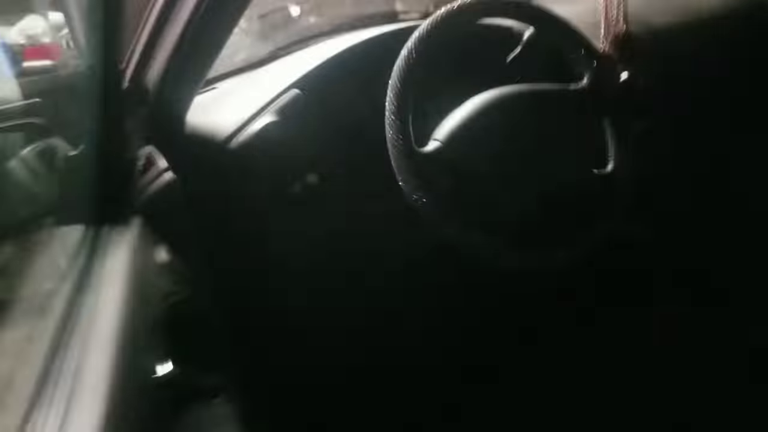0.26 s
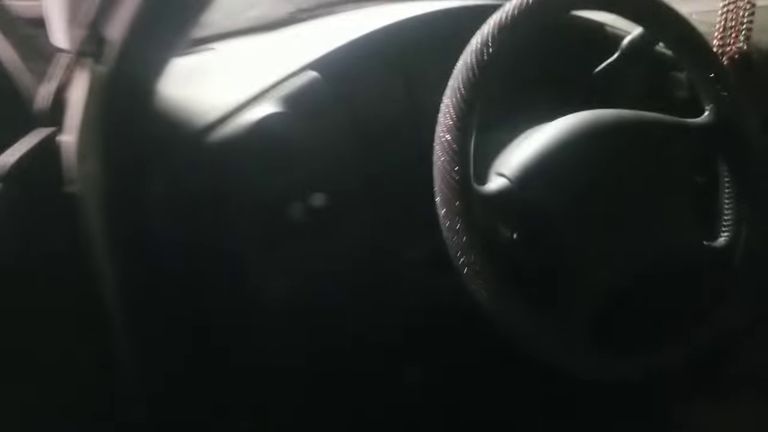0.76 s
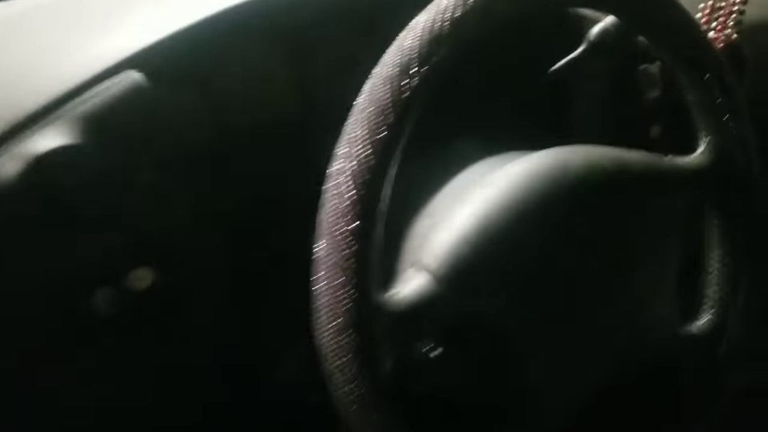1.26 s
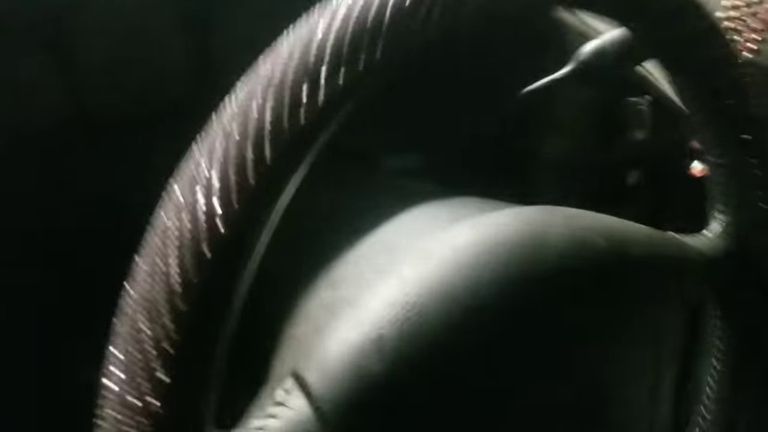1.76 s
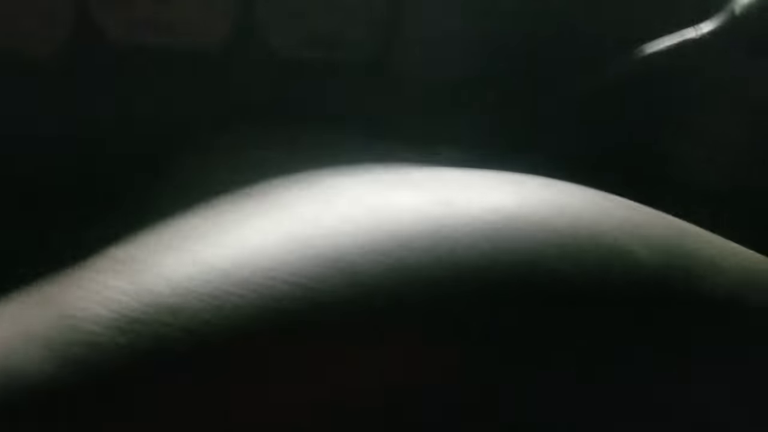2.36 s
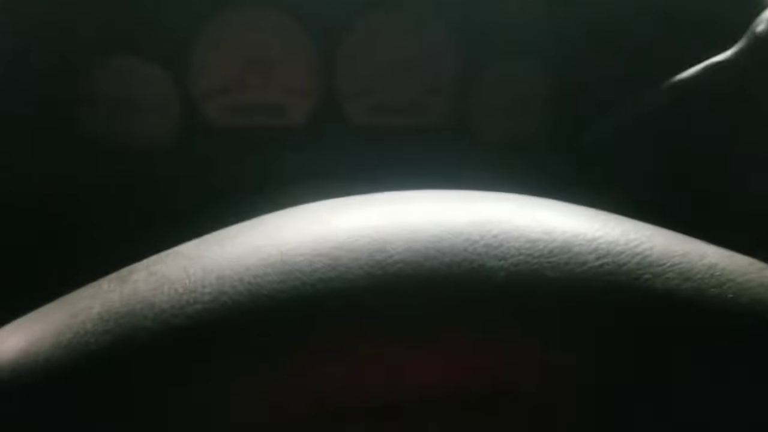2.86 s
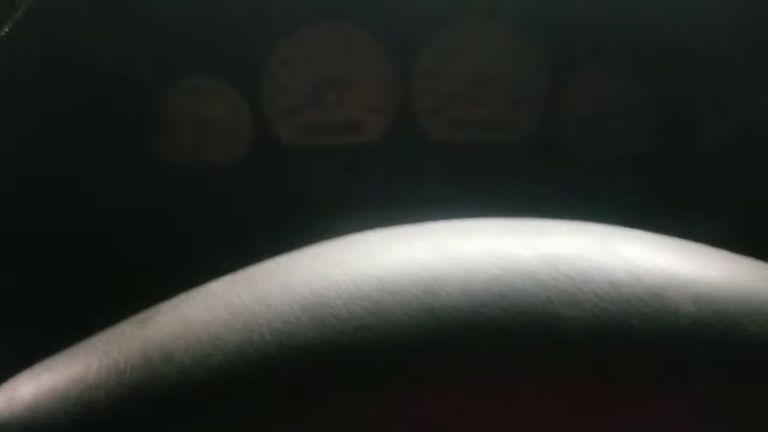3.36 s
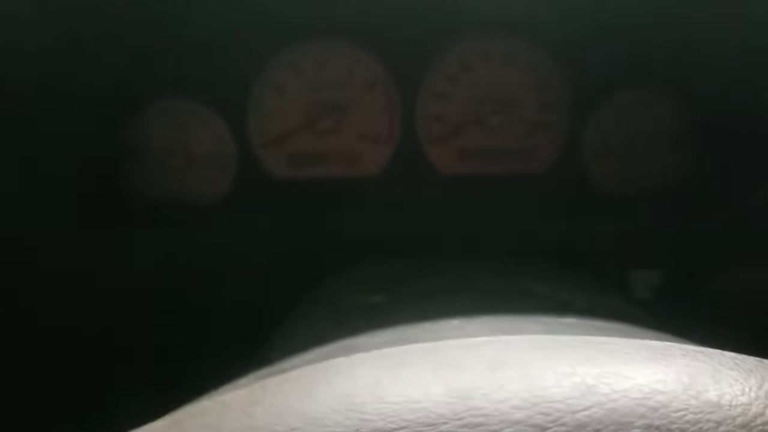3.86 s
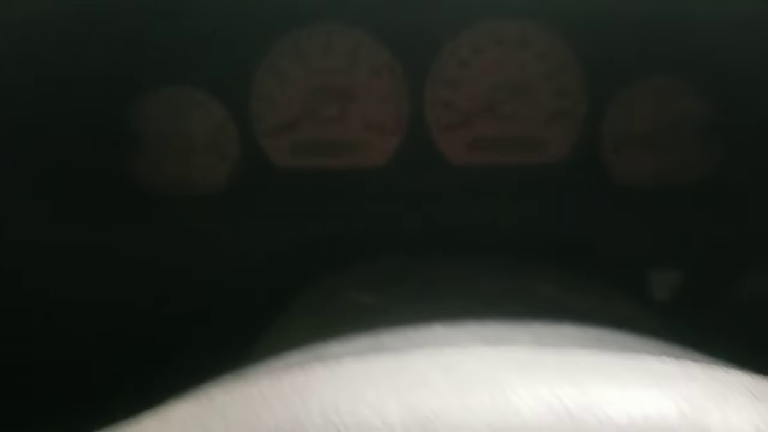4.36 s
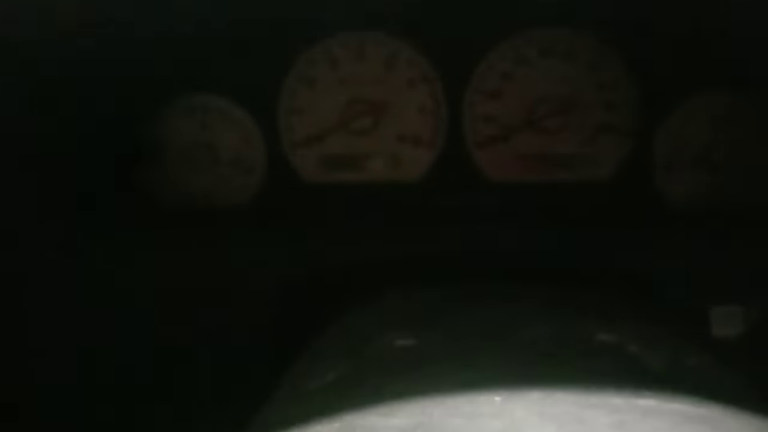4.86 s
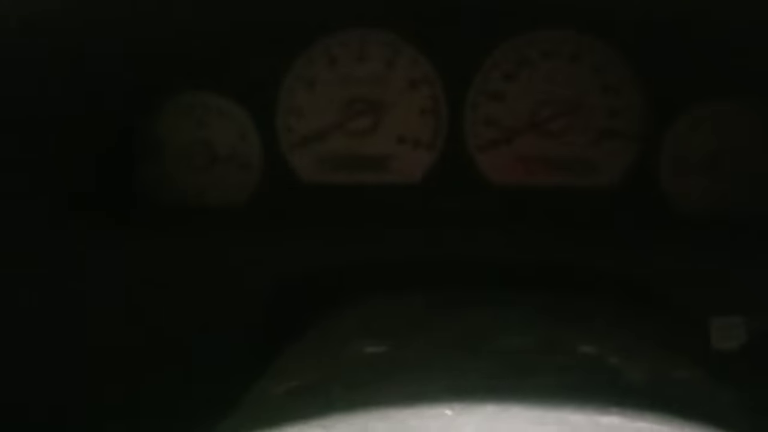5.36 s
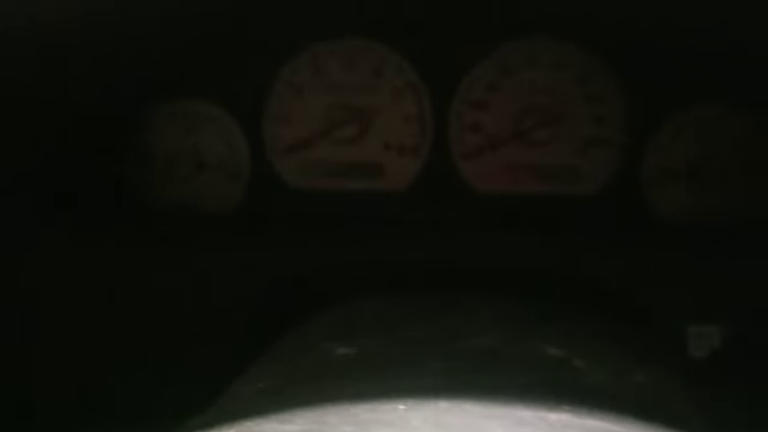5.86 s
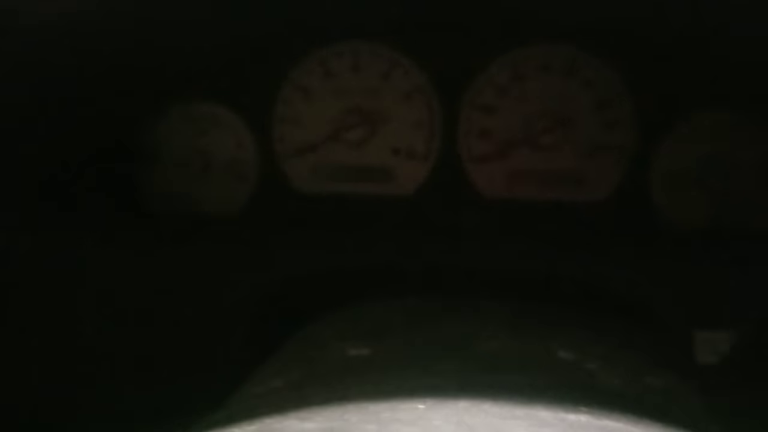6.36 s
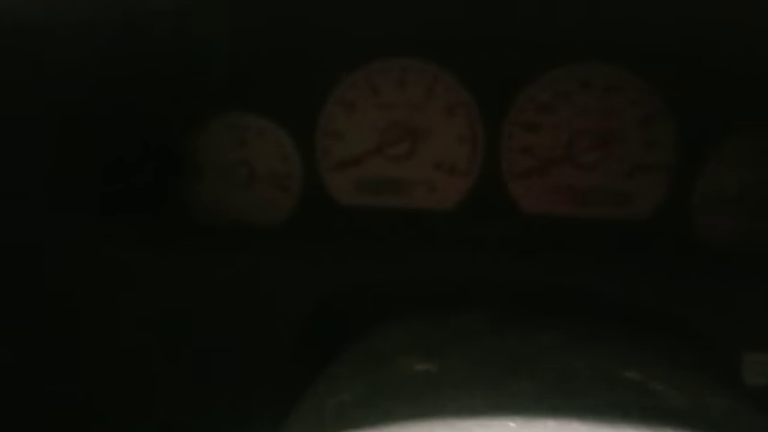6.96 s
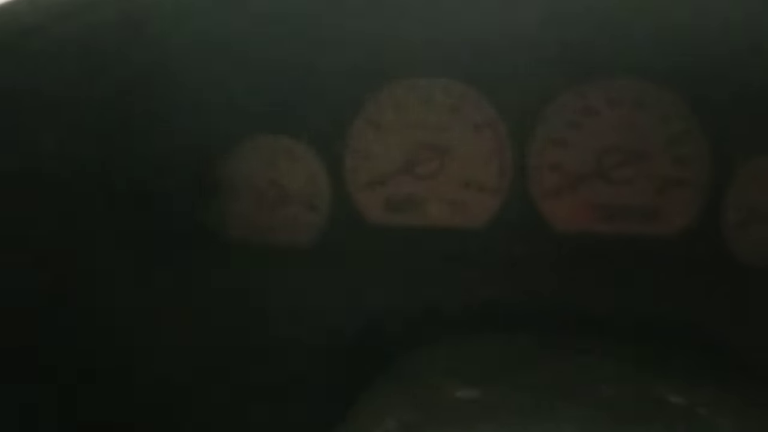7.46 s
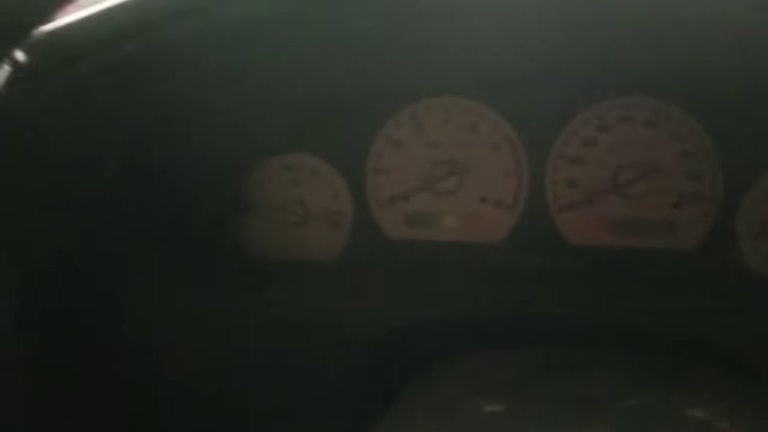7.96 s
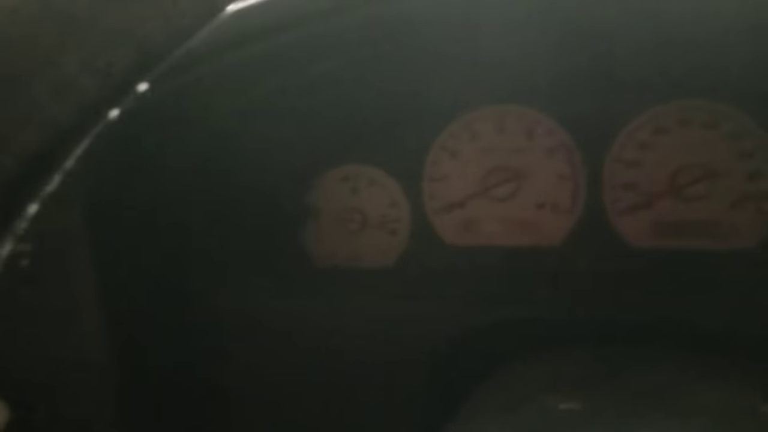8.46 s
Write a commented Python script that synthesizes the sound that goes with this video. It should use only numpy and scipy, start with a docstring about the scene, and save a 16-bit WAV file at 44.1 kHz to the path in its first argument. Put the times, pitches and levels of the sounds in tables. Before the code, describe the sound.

Inside a parked car, cloth rustles and a hard knock lands, then keys jangle loudly over dull bumps, and an ignition lock snaps twice without starting.

```python
"""Workshop hum and hiss, filtered noise and one tone, are low at first and rise around 1.7 s.
From the start sleeves rustle (noise with grains), resonant noise bursts scrape or swell, and light clicks fall.
A hard door knock, then trim taps, are dispersed pulses with dying noise. From 2.1 s a hand grabs the keys,
whose runs of collisions excite metal modes, over column bumps. A dry tick falls at 3.2 s; thin gliding tones
waver near 3.2-3.9 s and 7-8.5 s. Near 4.4 s and 7.3 s the ignition lock snaps, ringing its modes, and its
shroud thuds; no engine is heard."""
import sys
import numpy as np
from scipy import signal
from scipy.fft import rfft, irfft, next_fast_len
from scipy.io import wavfile
from scipy.ndimage import uniform_filter1d

SR = 44100
rng = np.random.default_rng(int(sys.argv[2]) if len(sys.argv) > 2 else 0)


def to_wav(sig):
    """Store sig (one row per channel, or 1-D mono) as 16-bit WAV at the path in sys.argv[1].

    Samples outside -1..1 are clipped; the rate is SR.
    """
    pcm = np.clip(np.atleast_2d(sig), -1, 1) * 32767
    pcm = np.round(pcm).astype(np.int16)
    wavfile.write(sys.argv[1], SR, pcm.T)  # frames by channels


N = 383563
RING = np.arange(14400) / SR  # time axis of one dying sound (s)
SIDE_LAG = 22  # lag at the right microphone of sound from the left (samples)

# Radiation of the plastic trim, shared by taps and shroud thuds: frequency_hz, relative_density_db
TRIM_SPECTRUM = [(35, -36), (60, -2.5), (672, 6), (1140, -4.5), (1690, -8), (2490, -19), (2870, -36),
                 (3390, -17), (3670, -50), (4420, -26), (8000, -63), (10400, -54), (17600, -120)]
# Damping of the plastic trim: frequency_hz, t60_s (before a blow's length factor)
TRIM_DAMPING = [(200, 0.2), (700, 0.1), (3000, 0.046)]


def gain_of(db):
    """Level is logarithmic: 20 dB is a factor of ten in amplitude."""
    return 10 ** (np.asarray(db) / 20)


def evened(x):
    """Power normalisation: scales to rms 1."""
    return x / np.sqrt(np.mean(x ** 2) + 1e-20)


def peaked(x):
    """Short-time power normalisation: the loudest few milliseconds get rms 1."""
    power = (x ** 2).mean(0)
    return x / np.sqrt(uniform_filter1d(power, size=160).max())


def read(points, hz):
    """Interpolation on a logarithmic frequency axis."""
    f, value = np.transpose(points)
    return np.interp(np.log(hz + 1), np.log(f + 1), value)


def add(mix, s, sound):
    """Linear superposition of a stereo sound on the mix from time s."""
    part = mix[:, round(s * SR):][:, :sound.shape[1]]
    part += sound[:, :part.shape[1]]


def colour(x, spectrum, tilt_db=0):
    """Minimum-phase filtering: causality forbids any sound ahead of the excitation."""
    hz = abs(np.fft.fftfreq(4096, 1 / SR))
    tilt = tilt_db * np.log2(np.maximum(hz, 200) / 1000)  # dB per octave about 1 kHz
    log_gain = np.log(gain_of(np.maximum(read(spectrum, hz) + tilt, -100)))
    # the Hilbert transform of the log gain supplies the phase
    response = np.fft.ifft(np.exp(np.conj(signal.hilbert(log_gain)))).real[:2048]
    taps = response * signal.windows.tukey(4096, .5)[2048:]
    return signal.oaconvolve(x, taps[None], axes=1)[:, :x.shape[1]]


def wander(hz, count=24):
    """Superposed sines of random phase make a random drift of rms 1, moving up to hz times a second."""
    t = np.linspace(0, N / SR, N // 128)
    rates = np.geomspace(hz / 10, hz, count)[:, None]
    drift = np.sin(2 * np.pi * (rates * t + rng.random((count, 1)))).sum(0)
    return np.interp(np.arange(N) / SR, t, evened(drift))


def diffuse(size, alike=1):
    """Diffuse-field coherence: two spaced microphones agree in the bass and part in the treble."""
    # left-right coherence: frequency_hz, coherence_ratio (before the factor alike)
    likeness = [(50, 0.94), (130, 0.48), (300, 0.59), (700, 0.021), (15000, 0.0054)]
    padded = next_fast_len(size)
    left, other = rfft(rng.standard_normal((2, padded)))
    same = np.clip(alike * read(likeness, np.fft.rfftfreq(padded, 1 / SR)), -1, 1)
    right = same * left + np.sqrt(1 - same ** 2) * other
    return irfft(np.array([left, right]), padded)[:, :size]


def scatter(decay, alike=1):
    """Frequency-dependent damping: dense reflections of energy 1, each band dying at its own speed."""
    hz = np.fft.rfftfreq(len(RING), 1 / SR)
    noise, out = rfft(diffuse(len(RING), alike)), 0
    centres, t60s = np.transpose(decay)
    for share, t60 in zip(np.eye(len(decay)), t60s):
        band = irfft(noise * read(np.c_[centres, share], hz), len(RING))
        fade = gain_of(-60 * RING / t60)
        out = out + band * fade / np.linalg.norm(fade)
    return out


def ring(modes, spread_db):
    """Modal superposition of energy 1: each blow excites and each microphone hears other mode strengths."""
    hz, db, t60 = np.transpose(modes)[:, :, None]
    waves = gain_of(db - 60 * RING / t60) / np.sqrt(t60) * np.exp(2j * np.pi * hz * RING)
    strength = gain_of(spread_db * rng.standard_normal((2, len(modes))))
    phase = np.exp(2j * np.pi * rng.random((2, len(modes))))
    return evened(((strength * phase) @ waves).imag) / np.sqrt(len(RING))


def bending(delays_ms, twist_rad):
    """Bending-wave dispersion: bass crosses a panel slower (delays hold at 1 kHz); the right lags by a twist."""
    khz = np.fft.rfftfreq(len(RING), 1 / SR) / 1000
    travel = 4 * np.pi * np.outer(delays_ms, np.sqrt(khz))
    phase = travel + np.array([[0], [1]]) * twist_rad
    return irfft(np.exp(-1j * phase), len(RING)) * np.linspace(1, 0, len(RING))


def blows(rows, spectrum, decay, offset_db, direct_db, delays_ms, pan_db, graze_db, length=1,
          twist_rad=0, alike=1, modes=None, ring_db=0, detune=0.023):
    """Impact response: surfaces graze, a direct pulse lands, panels shudder and any modes ring.

    offset_db adds to every row's level, length scales the t60s of the shudder's damping (the modes keep
    theirs), pan_db is left minus right."""
    out, pulse = np.zeros((2, N)), gain_of(direct_db) * bending(delays_ms, twist_rad)
    lead = 300  # samples of grazing ahead of the blow
    for s, level_db, tilt_db in rows:
        shudder = scatter([(hz, t60 * length) for hz, t60 in decay], alike)
        graze = diffuse(lead) * np.linspace(0, 1, lead) ** 2
        graze *= gain_of(graze_db) / np.linalg.norm(graze[0])
        sound = colour(np.hstack([graze, pulse + shudder]), spectrum, tilt_db)
        if modes:
            grip = 1 + detune * rng.standard_normal()  # the grip shifts all modes together
            held = [(hz * grip, mode_db + tilt_db * np.log2(hz / 1000), t60) for hz, mode_db, t60 in modes]
            ring_gain = gain_of(ring_db) * np.linalg.norm(sound[0])
            sound[:, lead:] += ring_gain * ring(held, spread_db=-9.0)
        add(out, s - lead / SR, gain_of(level_db + offset_db) * peaked(sound))
    return out * gain_of([[pan_db / 2], [-pan_db / 2]])


def hiss():
    """Interchannel delay: hiss from all around, and a part from the open door that is earlier on the left."""
    # hiss spectrum: frequency_hz, relative_density_db
    hiss_spectrum = [(590, -48.5), (1000, -11), (1160, -7), (1680, -1), (2200, -13.5), (2520, -9),
                     (2640, -5.5), (3020, -1), (3400, -3), (5070, -5), (5490, -3), (8050, -23), (9640, -13),
                     (10700, -20.5), (14000, -19.5), (14800, -29)]
    door_share = .35  # share of power
    left, right, door = rng.standard_normal((3, N))
    around = np.array([left, right])
    from_door = np.array([door, np.roll(door, SIDE_LAG)])
    both = np.sqrt(1 - door_share) * around + np.sqrt(door_share) * from_door
    return evened(colour(both, hiss_spectrum))


def shop(hum_db, hiss_db, mains_db, waver_db, hiss_waver_db, drone_db):
    """Modulated noise: rumble, low drone and hiss waver apart, low at first and rising around 1.7 s."""
    # hum spectrum: frequency_hz, relative_density_db
    hum_spectrum = [(12, -44.5), (20, -12.5), (43, -6.5), (64, -9.5), (99, -1), (129, -13), (237, -22.5),
                    (274, -15), (357, -8.5), (387, -11), (463, -11), (1000, -31), (1300, -57), (2200, -120)]
    # balance of the microphones: frequency_hz, left_minus_right_db
    lean = [(60, 1.5), (110, -0.5), (200, 0.5), (380, -6), (700, 0), (1290, 2.5), (2380, -2), (4400, 5.5),
            (8120, 6), (15000, -2.5)]
    rise_s, rise_takes_s, early_db = 1.7, 0.38, -11.5  # middle and slowness of the rise; level before it
    mains_hz = 104  # electrical hum
    t = np.arange(N) / SR
    rise_db = early_db * (1 - np.tanh((t - rise_s) / rise_takes_s)) / 2
    hum = evened(colour(diffuse(N), hum_spectrum))
    rumble = signal.sosfiltfilt(signal.butter(2, 200, fs=SR, output="sos"), hum)
    drone = hum - rumble
    wavering_rumble = rumble * gain_of(waver_db * wander(hz=11.0))
    wavering_drone = drone * gain_of(drone_db * wander(hz=7.5))
    air = gain_of(hum_db) * (wavering_rumble + wavering_drone)
    air += gain_of(mains_db) * np.sqrt(2) * np.sin(2 * np.pi * mains_hz * t + wander(hz=6))
    air += gain_of(hiss_db + hiss_waver_db * wander(hz=5)) * hiss()
    sides = []
    for side, sign in enumerate((1, -1)):
        balance = [(hz, sign * db / 2) for hz, db in lean]
        sides.append(colour(air[[side]], balance)[0])
    return np.array(sides) * gain_of(rise_db)


def cabin(x):
    """Reverberation by convolution: the faint tail of the cabin and the shop beyond its open door."""
    # reverberation: frequency_hz, t60_s
    cabin_decay = [(100, 0.71), (500, 0.061), (2000, 0.15), (5000, 0.32), (12000, 0.16)]
    return signal.oaconvolve(x, scatter(cabin_decay), axes=1)[:, :N]


def clunks():
    """Distant impacts: a weak direct pulse under the shudder of things further off in the shop."""
    # clunks: start_s, level_db (before offset), brightness_db_per_octave
    clunk_rows = [(0.586, -40, 0), (0.595, -39.5, -5)]
    # their spectrum: frequency_hz, relative_density_db
    far_spectrum = [(35, -58), (60, -19), (370, -14.5), (468, 1.5), (646, -15), (1280, -14), (1620, -28),
                    (1730, -25), (5380, -18.5), (10000, -59), (13000, -87), (22000, -120)]
    # their damping: frequency_hz, t60_s (before the length factor)
    far_damping = [(400, 0.71), (1500, 0.31), (6000, 0.14)]
    return blows(clunk_rows, far_spectrum, far_damping, offset_db=0.5, direct_db=-18,
                 delays_ms=(.5, .7), pan_db=-0.5, graze_db=-20.0, length=0.38)


def rustle(rub_offset_db, fizz_offset_db, grains_per_s, grain_db, flutter_db):
    """Stick-slip friction: cloth slips in small grains, a dull rub and a fizz that follow each stroke."""
    # strokes of sleeve and hand over seat and wheel:
    # fastest_s, rise_s, fall_s, rub_db, fizz_db (levels before the offsets)
    strokes = [(0.02, 1, 0.29, -38, -57), (0.599, 0.42, 0.45, -60.5, -75), (1.39, 0.35, 0.27, -89, -71),
               (1.66, 0.23, 1, -54, -62), (1.86, 1, 0.9, -58, -73.5), (2.16, 0.34, 0.43, -49.5, -60),
               (2.548, 0.14, 0.94, -62.5, -68), (4.47, 0.037, 0.12, -52, -57.5),
               (4.599, 0.22, 0.19, -66.5, -62), (4.8, 0.083, 0.18, -69.5, -69),
               (4.898, 0.076, 0.051, -56.5, -72), (7.28, 0.39, 0.32, -61, -64),
               (7.41, 0.088, 0.54, -55, -64), (7.63, 0.18, 0.51, -68, -68), (7.83, 0.19, 0.21, -56, -61.5),
               (8.051, 0.083, 0.56, -57.5, -70.5), (8.27, 0.33, 0.39, -69, -61)]
    # spectra of rub and fizz: frequency_hz, relative_density_db
    rub_spectrum = [(18, -33.5), (30, -6), (123, -1), (223, -12.5), (345, -0.5), (582, -7.5), (839, -11.5),
                    (1260, -13.5), (1630, -16), (3450, -20.5), (4970, -18.5), (7000, -36), (9100, -63),
                    (15400, -120)]
    fizz_spectrum = [(1200, -33), (2500, 4.5), (4000, 8), (5600, 7.5), (8200, -3.5), (10000, 3), (12500, 1),
                     (14500, -9)]
    depth_db = 20.5  # gained over a stroke's rise and lost over its fall
    hits = rng.uniform(-2.0, 1, N) * (rng.random(N) < grains_per_s / SR)
    grain_response = scatter([(500, 0.048), (6000, 0.013)])
    grains = evened(signal.oaconvolve(hits[None], grain_response, axes=1)[:, :N])
    flutter = gain_of(flutter_db * wander(hz=64.7))
    slip = (diffuse(N) + gain_of(grain_db) * grains) * flutter
    t = np.linspace(0, N / SR, N // 128)
    s, rise, fall, rub_db, fizz_db = np.transpose(strokes)[:, :, None]
    speed_db = -depth_db * np.maximum((s - t) / rise, (t - s) / fall)

    def envelope(db):
        """Power summation of the overlapping strokes."""
        return np.interp(np.arange(N) / SR, t, np.linalg.norm(gain_of(db + speed_db), axis=0))

    rub = envelope(rub_db + rub_offset_db) * evened(colour(slip, rub_spectrum))
    fizz = envelope(fizz_db + fizz_offset_db) * evened(colour(slip, fizz_spectrum))
    return rub + fizz


def thin_tones(waver, flutter_db):
    """Frequency and amplitude modulation: faint thin tones waver, swell, glide and fade, earlier on the left."""
    # thin tones: start_s, length_s, level_db (before the swell), first_pitch_hz, last_pitch_hz
    tone_rows = [(3.24, 0.4, -59.5, 2810, 2840), (3.3, 0.59, -58, 3380, 3430),
                 (3.39, 0.21, -71, 2310, 2340), (7.05, 0.28, -71, 1928, 1830),
                 (7.121, 0.24, -73, 1690, 1770), (7.55, 0.75, -75, 3120, 3050),
                 (7.8, 0.43, -67, 3420, 3330), (8.126, 0.19, -63, 1387, 1410),
                 (8.332, 0.14, -63.5, 1397, 1370)]
    out, bend = np.zeros((2, N)), 1 + waver * wander(hz=356)
    flutter = gain_of(flutter_db * wander(hz=111))
    for s, length, db, first_hz, last_hz in tone_rows:
        size, start = round(length * SR), round(s * SR)
        pitch = np.linspace(first_hz, last_hz, size) * bend[start:][:size]
        turns = np.cumsum(pitch) / SR
        tone = evened(np.sin(2 * np.pi * turns) * flutter[start:][:size])
        tone *= np.sin(np.linspace(0, np.pi, size))
        add(out, s, gain_of(db) * np.array([tone, np.roll(tone, SIDE_LAG)]))
    return out


def resonant_bursts(impulses_per_s, smooth, flutter_db, drift):
    """Noise-excited resonance: noise and random impulses drive one drifting resonance in each short burst."""
    # scrapes, a crack, dull rings and soft swells: start_s, length_s, level_db (before the taper),
    # resonance_hz, width_hz, taper_share (of the length, spent swelling and fading)
    burst_rows = [(0.007, 0.2, -54, 1635, 50, 0.92), (0.3218, 0.0026, -24.5, 3230, 2400, .4),
                  (0.338, 0.15, -53, 598, 92, 0.91), (0.345, 0.125, -52.5, 850, 503, 0.98),
                  (1.81, 0.11, -44.5, 630, 530, 0.91), (1.952, 0.034, -48.5, 503, 400, 1),
                  (2.077, 0.057, -55, 4800, 300, 0.85), (2.198, 0.36, -39, 396, 346, 0.32),
                  (2.196, 0.16, -45.5, 1080, 1400, 0.41), (2.202, 0.37, -45.5, 4300, 4150, 0.26),
                  (2.288, 0.022, -42.5, 6540, 900, 0.83), (2.317, 0.02, -40, 4970, 500, 1),
                  (2.419, 0.012, -27.5, 4470, 797, 0.92), (2.436, 0.012, -31.5, 4150, 800, 1),
                  (2.498, 0.03, -37.5, 5300, 510, 1), (2.493, 0.021, -19.5, 350, 118, 0.82),
                  (2.463, 0.056, -37, 1060, 1020, 0.64), (2.945, 0.03, -51, 370, 141, 1),
                  (4.446, 0.052, -48.5, 817, 119, 0.31), (4.49, 0.19, -62, 3760, 500, 0.6),
                  (4.468, 0.28, -66.5, 1840, 300, 0.6), (4.491, .19, -61.5, 11900, 1500, 0.59),
                  (4.656, 0.17, -63.5, 610, 60, 0.39), (4.741, 0.15, -55.5, 645, 220, 1),
                  (7.342, 0.12, -51.5, 75, 110, .5), (7.418, 0.053, -52, 520, 160, .5),
                  (7.079, 0.28, -70, 1860, 220, 0.54), (7.497, 0.98, -62.5, 3210, 1000, 0.42),
                  (8.22, 0.051, -56, 927, 130, 1), (8.251, 0.24, -60, 5170, 1800, 0.25)]
    out, shift = np.zeros((2, N)), wander(hz=13)
    flutter = gain_of(flutter_db * wander(hz=81.3))
    for s, length, db, hz, width, taper in burst_rows:
        size, start = round(length * SR), round(s * SR)
        sudden = rng.random(size) < impulses_per_s / SR
        drive = rng.standard_normal((2, size)) * (smooth + sudden) * flutter[start:][:size]
        moving_hz = hz * (1 + drift * shift[start:][:size])
        turn = np.exp(2j * np.pi * np.cumsum(moving_hz) / SR)
        r = np.exp(-np.pi * width / SR)
        # a double pole at zero frequency, shifted up to the moving resonance
        sound = (turn * signal.lfilter([1], np.poly([r, r]), drive / turn)).real
        add(out, s, gain_of(db) * evened(sound) * signal.windows.tukey(size, taper))
    return out


def tick():
    """Impact response: one dry tick behind the dashboard, its shudder far above the direct pulse."""
    # tick: start_s, level_db (before offset), brightness_db_per_octave
    tick_rows = [(3.237, -39.5, 0.5)]
    # dashboard spectrum: frequency_hz, relative_density_db
    dash_spectrum = [(88, -54), (150, -14), (398, 2), (978, -15.5), (1410, 4), (2590, -7), (3260, -2.5),
                     (3590, 0), (3950, -9), (6130, -19.5), (8490, -29), (12200, -22), (14500, -43)]
    # dashboard damping: frequency_hz, t60_s
    dash_damping = [(400, 0.87), (2000, 0.075), (8000, 0.087)]
    return blows(tick_rows, dash_spectrum, dash_damping, offset_db=-2.0, direct_db=-25,
                 delays_ms=(.3, .35), pan_db=0.5, graze_db=-16.5)


def trim_taps():
    """Light impacts on a damped panel: direct pulse and shudder of the plastic trim."""
    # taps: start_s, level_db (before offset), brightness_db_per_octave
    tap_rows = [(1.182, -41.5, -4), (1.362, -36.5, -2), (1.471, -36.5, -3.5), (1.604, -34.5, -5),
                (1.767, -20.5, 2), (7.575, -50, -3), (8.022, -41, -3.5), (8.083, -46.5, -4),
                (8.158, -44, -2), (8.355, -46.5, -1)]
    return blows(tap_rows, TRIM_SPECTRUM, TRIM_DAMPING, offset_db=-8.0, direct_db=-1,
                 delays_ms=(.6, .7), pan_db=1.5, graze_db=-12, length=0.62)


def column_bumps():
    """Dull impacts of hand and key fob on the steering column, with partly opposite phase at the two sides."""
    # bumps: start_s, level_db, brightness_db_per_octave
    bump_rows = [(2.241, -16, -1), (2.249, -32, 5), (2.274, -28, 1), (2.3, -31, 0), (2.35, -30, -4),
                 (2.36, -30, 0), (2.374, -29, 0.5), (2.416, -23, -1.5), (2.428, -33.5, 2),
                 (2.451, -28.5, 1), (2.482, -25, 1.5), (2.498, -29.5, 0.5), (7.365, -53.5, -2.5),
                 (7.376, -40, 1), (7.47, -46, -10)]
    # column spectrum: frequency_hz, relative_density_db
    column_spectrum = [(24, -51), (40, 5.5), (152, -3.5), (356, 1.5), (559, -7), (894, -18.5),
                       (1130, -12.5), (1400, -19.5), (1980, -30), (3000, -31), (3900, -67), (6600, -120)]
    # column damping: frequency_hz, t60_s
    column_damping = [(150, 0.057), (400, 0.062), (1500, 0.1)]
    return blows(bump_rows, column_spectrum, column_damping, offset_db=0.0, direct_db=-6.0,
                 delays_ms=(.4, .75), pan_db=2.0, graze_db=-19.5, alike=-0.7)


def door_knock():
    """Bending-wave impact: a hard knock on the door frame, its dispersed pulse stronger than the shudder."""
    # knock: start_s, level_db (before offset), brightness_db_per_octave
    knock_rows = [(0.32, -4, 0.5)]
    # door spectrum: frequency_hz, relative_density_db
    door_spectrum = [(24, -33.5), (40, -4.5), (121, -5.5), (317, -6.5), (470, 1.5), (731, -25), (891, -8),
                     (1490, -23), (1690, -16.5), (2330, -33.5), (2700, -29), (3900, -29), (4420, -42.5),
                     (5650, -38), (14400, -73.5)]
    # door damping: frequency_hz, t60_s
    door_damping = [(150, 0.11), (500, 0.075), (1300, 0.026), (4000, 0.017)]
    # travel through the door at 1 kHz: left_ms, right_ms
    door_paths = (1.7, 1.8)
    return blows(knock_rows, door_spectrum, door_damping, offset_db=-1.0, direct_db=6,
                 delays_ms=door_paths, pan_db=-2.0, graze_db=-20.0, twist_rad=0.59, alike=0)


def last_key(s, db, t60):
    """Free decay of a single mode: one key swings free of the bunch and rings on."""
    out = np.zeros((2, N))
    add(out, s, gain_of(db) * peaked(ring([(9065, 0, t60)], spread_db=0)))  # mode at 9065 Hz
    return out


def keys(offset_db, crack_db, hits_per_s, scrape, detune):
    """Repeated collisions excite modes: each fall is one firm hit and a dying run, with varying crack and ring."""
    # falls of the bunch: start_s, level_db (before offset), settle_t60_s
    falls = [(2.166, -27, 0.26), (2.173, -27, 0.14), (2.19, -25, 0.33), (2.234, -33, 0.12),
             (2.281, -34, 0.12), (2.295, -23, 0.093), (2.324, -28.5, 0.099), (2.376, -37, 0.098),
             (2.391, -23.5, 0.14), (2.4, -21.5, 0.22), (2.407, -18.5, 0.065), (2.425, -24, 0.15),
             (2.441, -30, 0.043), (2.458, -19.5, 0.12), (2.511, -27.5, 0.16), (2.547, -43, 0.041)]
    # metal modes of the keys: frequency_hz, level_db, t60_s
    key_modes = [(3752, -8, .16), (4390, -3, .2), (4815, -6, .15), (5160, -4, .08), (6800, -10, .15),
                 (7827, -9, .2), (8436, -11, .2), (11587, -3, .16), (11900, -3, .14), (12130, -1, .15),
                 (12263, 3, .15), (12598, 2, .17), (13808, -4, .12), (14050, -4, .12)]
    # spectrum of the crack: frequency_hz, relative_density_db
    key_spectrum = [(1180, -18), (2000, -11), (2890, -12), (3310, -19.5), (4470, -8.5), (7770, -13),
                    (10900, -15), (12200, 3), (13300, 0), (14300, -3), (14800, -12)]
    patchy_db = 4.5  # how much the colour of the crack changes with the keys that meet
    out, bands = np.zeros((2, N)), np.geomspace(1200, 14800, 24)
    for s, level_db, settle in falls:
        hits = rng.uniform(-1.03, 1, len(RING)) * (rng.random(len(RING)) < hits_per_s / SR)
        run = hits + scrape * rng.standard_normal(len(RING))
        run[0] = 1.3  # the first, firm collision
        run *= gain_of(-60 * RING / settle)
        patchy = np.c_[bands, read(key_spectrum, bands) + patchy_db * rng.standard_normal(len(bands))]
        crack = colour(scatter([(3000, 0.028), (12000, 0.029)]), patchy)
        struck = [(hz * (1 + detune * rng.standard_normal()), db, t60) for hz, db, t60 in key_modes]
        metal = gain_of(crack_db) * crack / np.linalg.norm(crack[0]) + ring(struck, spread_db=-9.5)
        jangle = signal.fftconvolve(run[None], metal, axes=1)
        add(out, s, gain_of(level_db + offset_db) * peaked(jangle))
    return out


def lock_and_clicks():
    """Impacts ring modes: a detent snaps and its plastic shroud thuds; scattered light clicks ring alike."""
    # detents: start_s, snap_db, snap_brightness_db_per_octave, thud_db (levels before offset)
    detents = [(4.4252, -28.5, -0.5, -33.5), (4.4526, -37, 1.5, -40), (7.344, -21.5, 4, -24.5)]
    # light clicks, scattered from 0.5 s to 8.3 s: start_s, level_db (before offset), brightness_db_per_octave
    clicks = [(0.532, -62.5, 1), (1.388, -48.5, 3), (1.544, -60, -4), (1.731, -54, 10), (1.809, -44.5, 0),
              (1.954, -45.5, -0.5), (2.693, -57, 4.5), (2.814, -54.5, 7.5), (4.614, -43.5, 0),
              (4.786, -51, -5), (4.819, -50.5, -2), (4.897, -52, 4.5), (7.45, -50, 6), (7.784, -42.5, -4),
              (7.831, -49.5, -5), (7.86, -50, 8), (8.334, -61, -6)]
    # spectrum of lock and clicks: frequency_hz, relative_density_db
    lock_spectrum = [(47, -4), (80, -43), (265, -5.5), (555, 8.5), (977, -15), (2180, 3), (2440, -8),
                     (3030, -4.5), (3680, -7), (4200, -5), (5570, 0), (6920, -13.5), (8240, -22),
                     (12200, -15), (14500, -26)]
    # their damping: frequency_hz, t60_s (before the length factor)
    lock_damping = [(150, 0.89), (600, 0.15), (2000, 0.17), (6000, 0.088), (12000, 0.11)]
    # modes of lock and clicks, then of the shroud: frequency_hz, level_db, t60_s
    lock_modes = [(545.5, 13, 0.17), (1203, 6, 0.035), (1580, 9.5, 0.053), (2110, -20, 0.015),
                  (2700, 5, 0.05), (3440, 8, 0.051), (3930, 17.5, 0.038), (5530, 10, 0.05),
                  (5640, 21, 0.014)]
    shroud_modes = [(517.5, 3, 0.12), (618.8, -9, 0.067), (776, -12, 0.073)]
    thud_lag_s, thud_tilt_db = 0.00785, -5.5  # delay after the snap; brightness per octave
    paths_ms = (.6, .7)  # left, right
    snaps = [(s, db, tilt_db) for s, db, tilt_db, _ in detents]
    thuds = [(s + thud_lag_s, db, thud_tilt_db) for s, _, _, db in detents]
    out = blows(snaps, lock_spectrum, lock_damping, offset_db=1.5, direct_db=-11, delays_ms=paths_ms,
                pan_db=0.5, graze_db=-12.0, length=0.7, modes=lock_modes, ring_db=3.5)
    out += blows(thuds, TRIM_SPECTRUM, TRIM_DAMPING, offset_db=-1.0, direct_db=-8.0, delays_ms=paths_ms,
                 pan_db=-5.0, graze_db=1.5, modes=shroud_modes, ring_db=13)
    out += blows(clicks, lock_spectrum, lock_damping, offset_db=-1.0, direct_db=-3.5, delays_ms=paths_ms,
                 pan_db=-2.0, graze_db=-14.0, modes=lock_modes, ring_db=-6.5)
    return out


def scene():
    """Linear superposition of the shop, the handling and its reverberant tail."""
    air = shop(hum_db=-64.0, hiss_db=-64.5, mains_db=-75.5, waver_db=2.5, hiss_waver_db=0.5, drone_db=3.7)
    far = clunks()
    cloth = rustle(rub_offset_db=2.0, fizz_offset_db=5.0, grains_per_s=130, grain_db=-2.0, flutter_db=0.5)
    knock = door_knock()
    near = thin_tones(waver=0.011, flutter_db=3.5)
    near += resonant_bursts(impulses_per_s=400, smooth=0.11, flutter_db=2.5, drift=0.027)
    near += tick() + trim_taps() + column_bumps()
    near += last_key(s=2.496, db=-47.5, t60=.26)
    near += keys(offset_db=-5.5, crack_db=13.5, hits_per_s=600, scrape=0.086, detune=0.00061)
    near += lock_and_clicks()
    tail = cabin(gain_of(-25.0) * knock + gain_of(-22) * near)
    return air + far + cloth + knock + near + tail


def record(dry):
    """Saturation and band limiting: hard clipping at full scale, then a lowpass on the top of the treble."""
    lowpass = signal.firwin(301, 14850, window=("kaiser", 9), fs=SR)  # edge in Hz
    return signal.oaconvolve(np.clip(dry, -1, 1), lowpass[None], "same")


dry = scene()
out = record(dry)
to_wav(out)
```